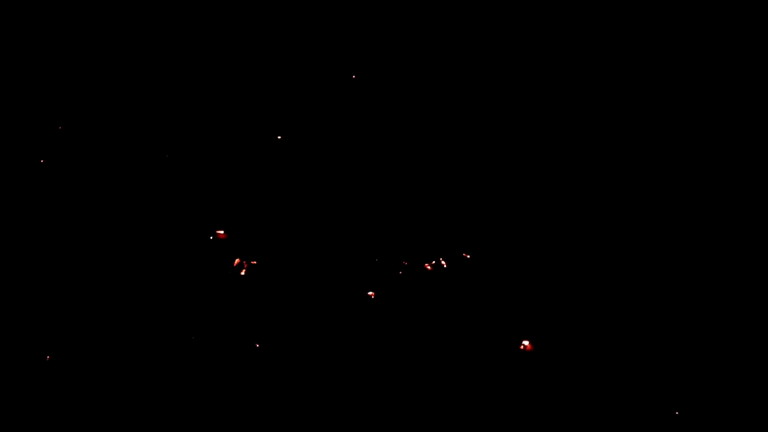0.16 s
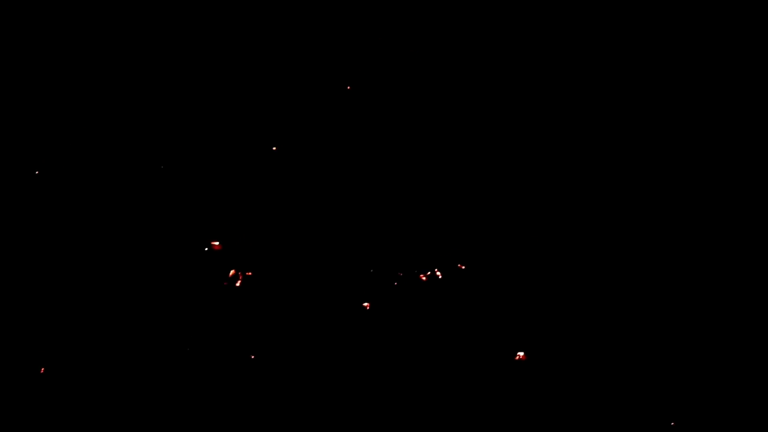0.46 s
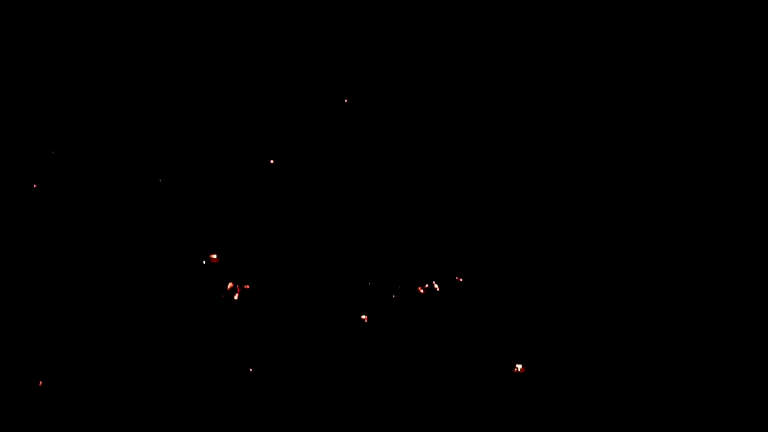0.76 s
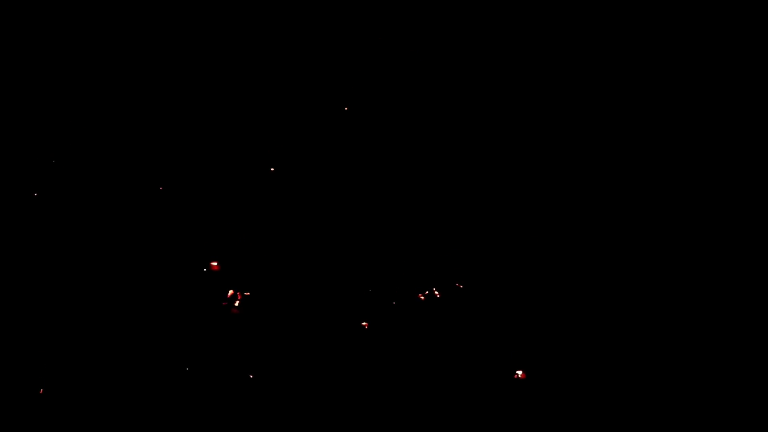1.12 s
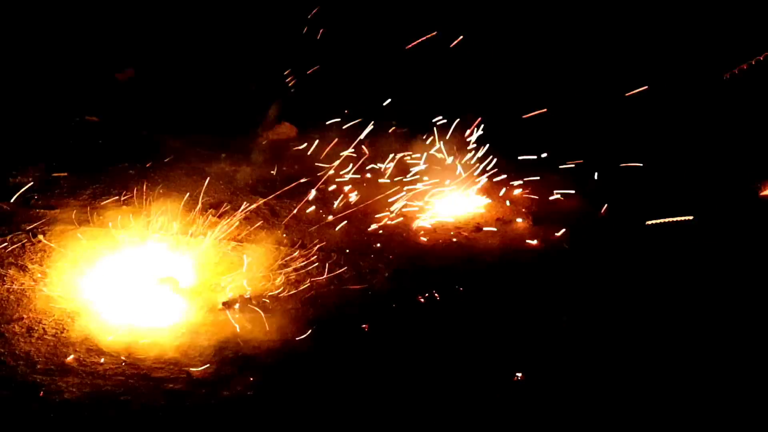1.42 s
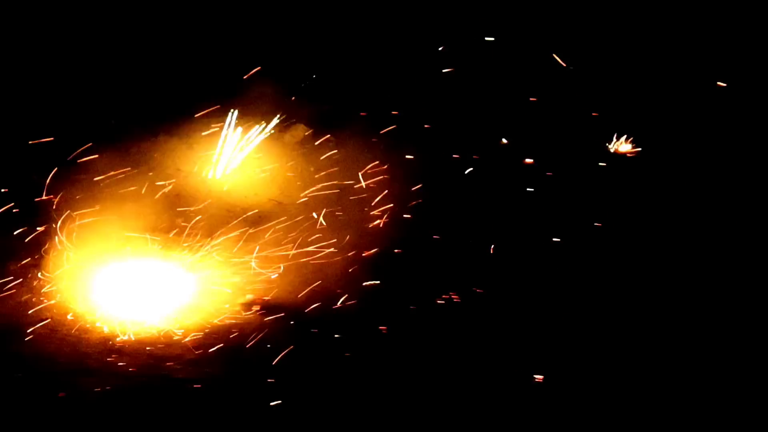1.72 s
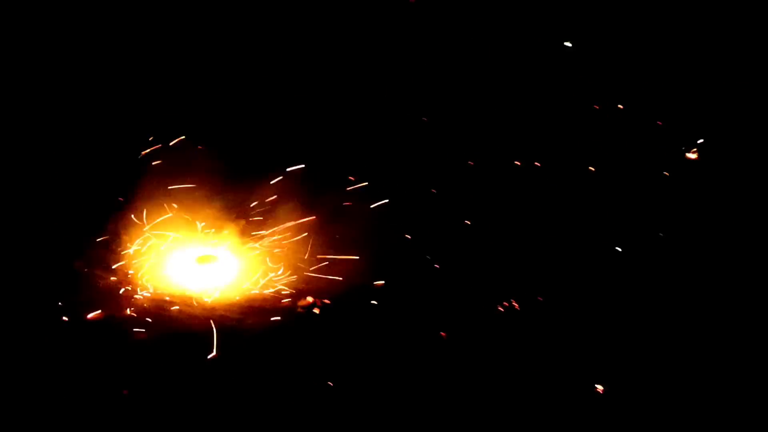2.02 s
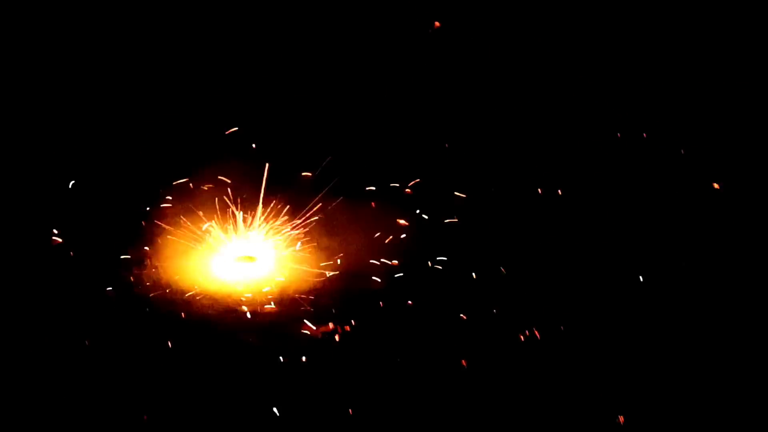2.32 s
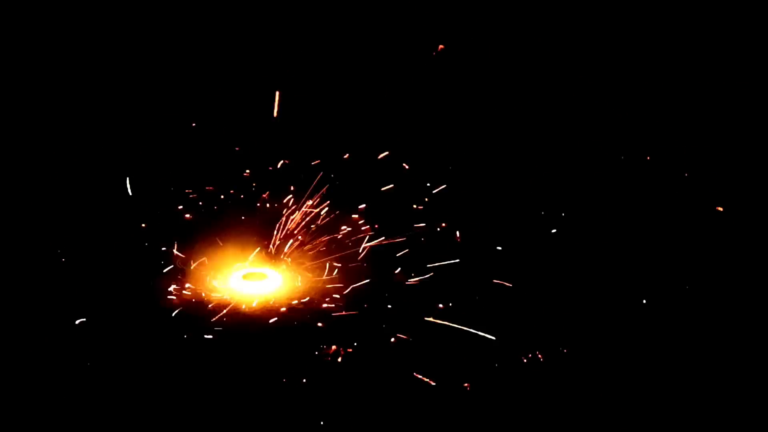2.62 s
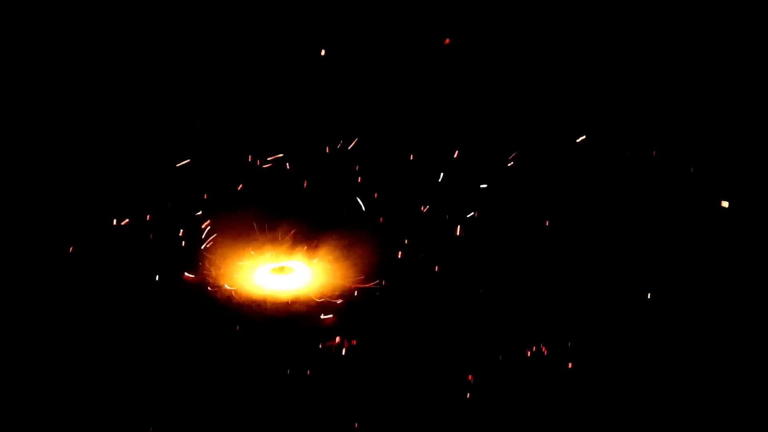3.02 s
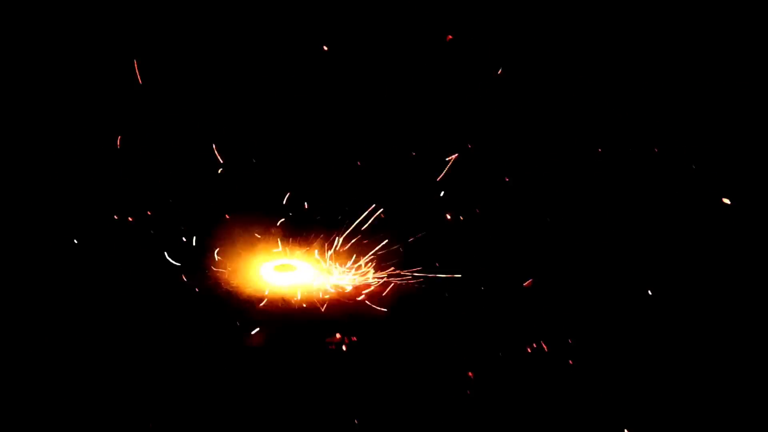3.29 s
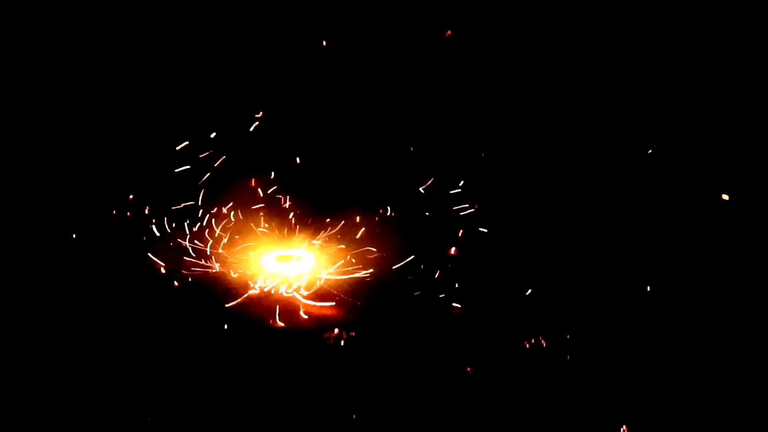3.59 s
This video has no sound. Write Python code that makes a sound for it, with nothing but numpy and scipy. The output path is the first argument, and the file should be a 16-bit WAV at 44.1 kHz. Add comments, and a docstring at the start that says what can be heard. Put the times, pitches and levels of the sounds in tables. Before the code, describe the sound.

Ground spinner firework pops, sputters, then screams in a fluttering, slowly falling whistle at night

```python
"""A yard at night: a whistling ground spinner lights among crickets and a few soft, distant thumps.
It pops, sputters and chokes while it spins up to some 50 turns a second. After a short rise,
the tube's pitch falls as the fuel burns down. Each turn swings the nozzle to and from the listener:
partials warble in level and by Doppler shift, filtered-noise hiss pulses, and spin harmonics puff the air.
Crickets are trains of falling tone bursts, thumps are noise-fed resonators, the night is shaped noise."""
import sys
import numpy as np
from scipy import signal
from scipy.fft import rfft, irfft
from scipy.io import wavfile
from scipy.ndimage import uniform_filter1d

SR = 44100
rng = np.random.default_rng(int(sys.argv[2]) if len(sys.argv) > 2 else 0)


def log_audio(samples):
    """Write samples as a 16-bit WAV file to the path given in sys.argv[1]."""
    # one column per channel
    frames = np.atleast_2d(samples).T
    # limit to full scale, then quantise
    limited = np.clip(frames, -1, 1)
    pcm = np.round(limited * 32767).astype(np.int16)
    wavfile.write(sys.argv[1], SR, pcm)


N = 165375

# mean pitch of the tube, before warble and wander: time_s, pitch_hz
TUBE_PITCH = [(1.37, 3541), (1.42, 3625), (1.46, 3666), (1.54, 3602), (1.6, 3541), (1.7, 3406),
              (1.85, 3343), (2.0, 3220), (2.2, 3078), (2.4, 2984), (2.58, 2901), (2.8, 2853), (2.95, 2809),
              (3.15, 2780), (3.35, 2706), (3.55, 2663), (3.75, 2621)]
# spin speed: time_s, spin_turns_per_s
SPIN_SPEED = [(1.37, 6.78), (1.69, 32.6), (1.85, 49.2), (2.1, 52.2), (2.35, 49.01), (2.65, 48.1),
              (3.0, 47.96), (3.4, 46.5), (3.75, 50)]
# whistle before beaming and chokes: time_s, level_db
WHISTLE_LEVEL = [(1.355, -57), (1.368, -35), (1.373, -9), (1.39, -15.5), (1.43, -17.5), (1.47, -10),
                 (1.525, -17), (1.555, -14), (1.598, -17.5), (1.625, -12), (1.64, -16), (1.70, -12.5),
                 (1.85, -13), (2.05, -12), (2.25, -13.5), (2.55, -16.5), (2.85, -17), (2.95, -19),
                 (3.15, -19), (3.25, -20.5), (3.44, -21.5), (3.48, -19), (3.62, -20), (3.75, -23)]
# unsteady burning, relative to the whistle: time_s, cycle_scatter_db, strong_weak_alternation_db
UNSTEADY_BURN = [(1.37, -9, -25), (1.40, 3.5, -10), (1.47, -8, -24), (1.53, -2, -39), (1.58, 1.5, -15),
                 (1.63, -4.5, -4), (1.70, -15.5, -11.5), (1.76, -20, -9), (1.83, -25, -29),
                 (1.95, -52, -54.5), (2.3, -55, -63)]
# spectral shape of the sputter: frequency_hz, relative_level_db
SPUTTER_COLOUR = [(40, -31), (150, -11), (400, -1), (800, 1), (1700, -0.5), (2100, -6), (2500, -14.5),
                  (3300, -1), (4500, -4.5), (6000, -11), (7200, -3.5), (8300, -7.5), (14000, -9.5),
                  (16000, -21)]
# overtones against the fundamental, before beaming: time_s, second_db, third_db, fourth_db, fifth_db
OVERTONE_LEVELS = [(1.4, -15, -28, -32, -38), (1.65, -13, -25, -28, -36), (2.05, -12, -23, -21, -30),
                   (2.4, -10, -21, -26, -35), (2.75, -10, -20, -33, -39), (3.1, -13, -21, -32, -47),
                   (3.75, -13, -21, -31, -46)]
# directivity of partials 1 to 5, before the share below: front_swing_db, side_dip_db
BEAM_SWING = [(1.6, 4.5), (2.8, 7), (4, 10), (3, 8), (2.5, 6)]
# share of that directivity in force: time_s, share_ratio
BEAM_SHARE = [(1.6, 0.65), (1.75, 0.94), (2.2, 0.34), (2.6, 0.97), (3.5, 1.28)]
# chokes of the burn, each with a pop: start_s, depth_db, recovery_s, pop_db
BURN_CHOKES = [(1.4063, 14, 0.0019, -24), (1.412, 8, 0.0033, -17), (1.4405, 31, 0.011, -12),
               (1.4557, 18.5, 0.0043, -4), (1.476, 29.5, 0.0063, -3), (1.4927, 29.5, 0.0075, -3.5),
               (1.5034, 36, 0.0095, -8.5), (1.5385, 28, 0.0058, -24), (1.5686, 27.5, .003, -11),
               (1.6615, 24.5, 0.0096, -6.5), (1.812, 6.5, 0.0026, -15)]
# ignition cracks: centre_s, level_db
IGNITION_CRACKS = [(1.344, -19), (1.3466, -19), (1.35, -19), (1.354, 0.5)]
# jet hiss before sparks, treble, spin and chokes: time_s, level_db
JET_LEVEL = [(1.325, -71), (1.345, -33.5), (1.38, -26), (1.7, -24.5), (1.9, -36.5), (2.1, -39.5),
             (2.4, -38), (2.75, -36.5), (3.1, -38), (3.38, -39.5), (3.5, -36.5), (3.75, -39.5)]
# spectral shape of the hiss: frequency_hz, relative_level_db
HISS_COLOUR = [(35, -6), (100, 3), (280, -1), (470, 3.5), (950, -2.5), (1500, 4.5), (2300, -4.5), (3200, 7),
               (4000, -4), (4700, -1), (6800, -6.5), (9000, -10), (11000, -12.5), (15500, -23)]
# gain of the hiss above the split frequency: time_s, gain_db
TREBLE_GAIN = [(1.35, -2), (1.9, 12), (2.4, 1), (2.85, 3), (3.0, -2), (3.75, -6)]
# air puffs at 1, 2, 3, 4 and 6 times the spin: peak_level_db, fade_db_per_s
PUFF_HARMONICS = [(-51.5, 4), (-43, 6.5), (-46, 6.5), (-45.5, 22), (-55, 17)]
# near cricket, high chirps: start_s, syllable_count, level_db
NEAR_CHIRPS = [(.085, 3, -56), (.305, 3, -61), (.525, 3, -58.5), (0.744, 3, -56), (.972, 2, -57),
               (1.128, 3, -54)]
# second cricket, low chirps: start_s, syllable_count, level_db
SECOND_CHIRPS = [(.150, 3, -55), (.362, 1, -62.5), (.621, 3, -53), (1.224, 3, -61.5)]
# far crickets that trill on: pitch_hz, rate_syllables_per_s, fall_ratio, level_db
FAR_TRILLS = [(9400, 41, 0.013, -64.5), (9100, 18, 0.03, -69.5), (5580, 24, .06, -71),
              (3300, 17, 0.006, -74.5)]
# soft far thumps, perhaps running steps, before a final gain of 1.2: start_s, level_db
FAR_THUMPS = [(.05, -60), (0.094, -53), (.352, -55), (.56, -57), (.772, -57), (1.015, -59), (1.228, -59)]
# resonances of the thumps: frequency_hz, width_hz, relative_level_db
THUMP_MODES = [(88, 30, -3), (146, 25, 0), (215, 70, -2), (330, 22, -1)]
# spectral shape of the night air: frequency_hz, relative_level_db
NIGHT_COLOUR = [(18, -28), (30, -3), (71, 4), (133, 0), (479, -11), (4540, -20), (5450, -17.5),
                (8060, -16.5), (8950, -15), (9940, -19), (15500, -27)]

# shares of the pitch; the Doppler share holds at the stated spin and scales with speed
DOPPLER, DOPPLER_SPIN_HZ, WANDER, JITTER = 0.032, 49.73, 0.003, 0.00354
UNSTEADY = 0.0122  # pitch wander share per unit of cycle scatter gain
OVERSHOOT, OVERSHOOT_S = 0.11, 0.013  # greatest sharpness share after a choke, and its settling time
CRACK_S, POP_S = 0.00029, 0.00025
SURGE_S, SURGE_DB, SPIT_S, SPIT_DB = 0.0013, -0.5, 0.00077, -5  # levels against the pop
JET_SWING_DB, JET_FLICKER_DB, JET_SPLIT_HZ = 1.5, 0.58, 8700
SPARKS_PER_S, SPARK_SPREAD_DB, SPARK_DB = 1300, 5, -9.5
PUFF_PEAK_S, PUFF_RISE_DB_PER_S = 2.26, 2
YARD_T60_S, YARD_DB = 0.62, -26
LEAD_S, LEAD_DB = 0.0123, -3  # advance and level of the near cricket's opening strokes
THUMP_DECAY_S = 0.051
NIGHT_DB = -60
TOP_HZ = 15500


def undb(db):
    """Decibel law: amplitude is ten to the power db / 20."""
    return 10 ** (np.asarray(db) / 20)


def curve(table, axis=1):
    """Linear interpolation: a table column joined by straight lines in time."""
    rows = np.array(table, float)
    return np.interp(np.arange(N) / SR, rows[:, 0], rows[:, axis])


def unit(x):
    """Normalisation: scale to an rms of 1."""
    return x / np.sqrt(np.mean(x ** 2))


def colour(x, points):
    """Minimum-phase filtering: a folded cepstrum gives a causal response through (Hz, dB) points."""
    hz, db = np.array(points, float).T
    bin_hz = np.arange(2049) * SR / 4096
    log_gain = np.interp(np.log(bin_hz + 1), np.log(hz), db) * np.log(10) / 20
    fold = np.r_[1, np.full(2047, 2), 1, np.zeros(2047)]
    cepstrum = irfft(log_gain) * fold
    response = irfft(np.exp(rfft(cepstrum)))
    return signal.fftconvolve(x, response)[:N]


def walk(rate):
    """Smoothed random steps: about rate new values per second, with an rms of 1."""
    k = max(int(SR / rate), 1)
    steps = np.repeat(rng.standard_normal(N // k + 1), k)
    return unit(uniform_filter1d(uniform_filter1d(steps, k), k)[:N])


def choking(t):
    """Interrupted combustion: the burn's gain collapses in 0.33 ms at each choke, then regrows."""
    loss_db = 0
    for start, depth, recovery, _ in BURN_CHOKES:
        collapse = np.clip((t - start) / 0.00033, 0, 1)
        loss_db = loss_db + depth * collapse * np.exp(-((t - start) / recovery) ** 2)
    return undb(-loss_db)


def whistle_pitch(t, turn, rough):
    """Doppler principle: rotation sways the tube's pitch, which also wanders and restarts sharp."""
    doppler = DOPPLER * curve(SPIN_SPEED) / DOPPLER_SPIN_HZ * (1 + 0.1374 * walk(40))
    deepest = max(row[1] for row in BURN_CHOKES)
    restarts = [depth / deepest * (t > start) * np.exp(-((t - start) / OVERSHOOT_S) ** 2)
                for start, depth, _, _ in BURN_CHOKES]
    sharp = OVERSHOOT * np.max(restarts, axis=0) * np.minimum(2 * rough, 1)
    wander = WANDER * walk(45) + JITTER * walk(1200) + UNSTEADY * rough * walk(350)
    return curve(TUBE_PITCH) * (1 + doppler * np.cos(turn) + wander + sharp)


def sputter(cycles, turn, rough):
    """Irregular excitation: one pulse per tube cycle, of random or alternating strength."""
    index = np.round(cycles).astype(int)
    pulse = np.exp(7 * (np.cos(2 * np.pi * cycles) - 1))
    strength = 3 - rng.gamma(3, 1, N)  # zero mean, skewed; one draw serves each cycle
    grain = 0.45 * rng.standard_normal(N)
    scatter = unit(colour(pulse * (strength[index] + grain), SPUTTER_COLOUR))
    alternating = unit(colour(pulse * (-1.) ** index * walk(750), SPUTTER_COLOUR))
    alternation_gain = undb(curve(UNSTEADY_BURN, axis=2) + 6.1 * np.sin(turn))
    return rough * scatter + alternation_gain * alternating


def whistle(t, turn, burn):
    """Directivity of a rotating source: each partial swells facing the listener and dips side-on."""
    rough = undb(curve(UNSTEADY_BURN))
    cycles = np.cumsum(whistle_pitch(t, turn, rough)) / SR
    lobes = np.sqrt(np.sin(turn) ** 2 + 0.0067) ** 0.82 - 0.75
    tone = 0
    for k, (front_db, side_db) in enumerate(BEAM_SWING):
        beam = front_db * np.sin(turn + 0.2) + side_db * lobes * (1 + 0.3 * walk(60))
        if k == 0:
            level = 0.45 * walk(100)
        else:
            level = curve(OVERTONE_LEVELS, axis=k) + 0.8 * k * walk(260)
        gain = undb(curve(BEAM_SHARE) * beam + level)
        phase = 2 * np.pi * (k + 1) * cycles + 0.1 * k * walk(900)
        tone = tone - np.sqrt(2) * gain * np.cos(phase)
    lit = t > WHISTLE_LEVEL[0][0]
    return (tone + sputter(cycles, turn, rough)) * undb(curve(WHISTLE_LEVEL)) * burn * lit


def snap(u):
    """Doublet pressure pulse: a deep trough between two crests."""
    return (2 * u ** 2 - 1) * np.exp(-u ** 2)


def pops(t):
    """Blast pulses: ignition snaps, then a spit, a snap and a slower gas surge at each choke."""
    out = sum(undb(db) * snap((t - centre) / CRACK_S) for centre, db in IGNITION_CRACKS)
    spit_colour = [(200, -4), (1200, -5.5), (5000, 2.5), (15000, -8)]
    spit = undb(SPIT_DB) * unit(colour(rng.standard_normal(N), spit_colour))
    for start, _, _, db in BURN_CHOKES:
        u = np.maximum(t - start, 0) / SURGE_S
        surge = undb(SURGE_DB) * (t > start) * (1 - u) * np.exp(-u)  # overpressure, then suction
        spit_burst = spit * np.exp(-((t - start) / SPIT_S) ** 2)
        out = out + undb(db) * (snap((t - start) / POP_S) + surge + spit_burst)
    return out


def jet(turn, burn):
    """Turbulent jet noise: shaped hiss and random sparks, swelling once a turn, with varying treble."""
    struck = (rng.random(N) < SPARKS_PER_S / SR) * rng.choice([-1, 1], N)
    sparks = struck * undb(SPARK_SPREAD_DB * np.minimum(rng.exponential(size=N), 5))
    spark_colour = [(200, -7), (1500, 4.5), (7000, -8.5), (15000, -16)]
    hiss = unit(colour(rng.standard_normal(N), HISS_COLOUR))
    hiss = hiss + undb(SPARK_DB) * unit(colour(sparks, spark_colour))
    split = signal.butter(2, JET_SPLIT_HZ, fs=SR, output="sos")
    low = signal.sosfiltfilt(split, hiss)
    hiss = low + undb(curve(TREBLE_GAIN)) * (hiss - low)
    level_db = curve(JET_LEVEL) + JET_SWING_DB * np.sin(turn) + JET_FLICKER_DB * walk(40.02)
    return hiss * undb(level_db) * np.sqrt(burn)


def puffs(t, turn):
    """Rotational noise: the whirling jet flutters the air at multiples of the spin rate."""
    age = t - PUFF_PEAK_S
    out = 0
    for k, (db, fade) in zip((1, 2, 3, 4, 6), PUFF_HARMONICS):
        level_db = db - fade * np.maximum(age, 0) + 1.5 * walk(14)
        out = out + undb(level_db) * np.cos(k * turn)
    rise = undb(PUFF_RISE_DB_PER_S * np.minimum(age, 0))
    return np.sqrt(2) * out * rise * (t > WHISTLE_LEVEL[0][0])


def yard(x):
    """Diffuse scattering: open surroundings return a faint, dull, exponentially decaying noise tail."""
    t = np.arange(SR // 2) / SR
    dull = signal.lfilter([1], [1, -0.6], rng.standard_normal(len(t)))
    tail = dull * undb(-60 * t / YARD_T60_S) * (t > 0.012)
    return x + undb(YARD_DB) * signal.fftconvolve(x, tail / np.linalg.norm(tail))[:N]


def syllables(place, hz, fall, duty):
    """Stridulation: each wing stroke, one unit of place, is a swelling tone that falls at its end."""
    u = np.minimum(place % 1 / duty, 1)
    phase = 2 * np.pi * np.cumsum(hz * (1 - fall * u ** 2)) / SR
    return np.sqrt(2) * np.sin(np.pi * u) * np.sin(phase)


def chirps(t, table, hz, fall, period_s, duty):
    """Pulse trains: short runs of evenly spaced syllables."""
    out = 0
    for start, count, db in table:
        place = np.clip((t - start) / period_s, 0, round(count))
        out = out + undb(db) * syllables(place, hz, fall, duty)
    return out


def crickets(t):
    """Superposed stridulation: two chirping crickets and several far, wandering trills."""
    near = chirps(t, NEAR_CHIRPS, hz=8800, fall=0.019, period_s=0.0474, duty=0.57)
    near = near + chirps(t, SECOND_CHIRPS, hz=6050, fall=0.12, period_s=0.0445, duty=0.4)
    lead = chirps(t + LEAD_S, NEAR_CHIRPS, hz=8800, fall=0.04, period_s=0.049, duty=0.2)
    near = near + undb(LEAD_DB) * lead
    far = 0
    for hz, rate, fall, db in FAR_TRILLS:
        gain = undb(db + 2.9 * walk(11.4))
        place = rate * t + 0.204 * walk(7.2)
        far = far + gain * syllables(place, hz * (1 + 0.003 * walk(81)), fall, 0.7)
    return near * undb(1.7 * walk(50.5)) + far


def thumps(t):
    """Damped resonance: dull, scuffing bursts of noise through low resonators."""
    push = 0
    for start, db in FAR_THUMPS:
        onset = np.clip((t - start) / 0.0048, 0, 1)
        push = push + undb(db) * onset * np.exp(-np.maximum(t - start, 0) / THUMP_DECAY_S)
    ring = 0
    for hz, width, db in THUMP_MODES:
        b, a = signal.iirpeak(hz, hz / width, SR)
        ring = ring + undb(db) * unit(signal.lfilter(b, a, rng.standard_normal(N)))
    return 1.2 * push * unit(ring)


def night_air():
    """Ambient noise: a steady random spectrum whose level drifts slightly."""
    return undb(NIGHT_DB + 0.7 * walk(4.3)) * unit(colour(rng.standard_normal(N), NIGHT_COLOUR))


def scene():
    """Superposition: the spinner with its yard scatter, the crickets, the thumps and the night."""
    t = np.arange(N) / SR
    turn = 2 * np.pi * np.cumsum(curve(SPIN_SPEED) * (t > SPIN_SPEED[0][0])) / SR
    burn = choking(t)
    spinner = whistle(t, turn, burn) + pops(t) + jet(turn, burn) + puffs(t, turn)
    return (yard(spinner) + crickets(t) + thumps(t) + night_air())[None]


def record(dry):
    """Band limitation: the microphone drops the deepest bass, clips at full scale and cuts the top."""
    bass_cut = signal.butter(2, 30, "high", fs=SR, output="sos")
    top_cut = signal.ellip(10, 0.2, 80, TOP_HZ, fs=SR, output="sos")
    x = signal.sosfilt(bass_cut, dry)
    return signal.sosfilt(top_cut, np.clip(x, -1, 1))


dry = scene()
out = record(dry)
log_audio(out)
```